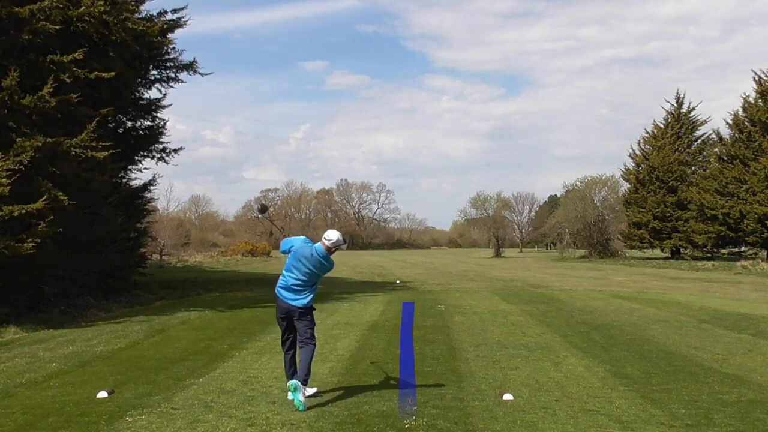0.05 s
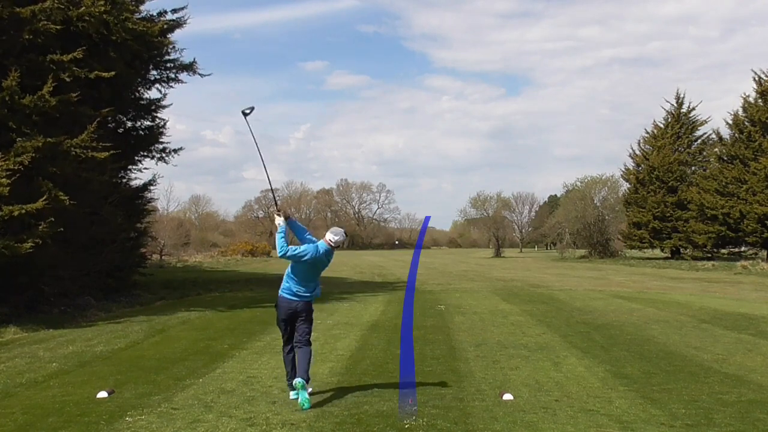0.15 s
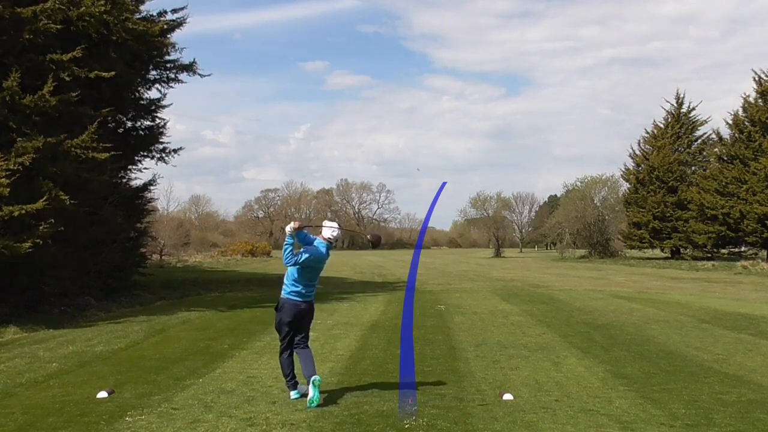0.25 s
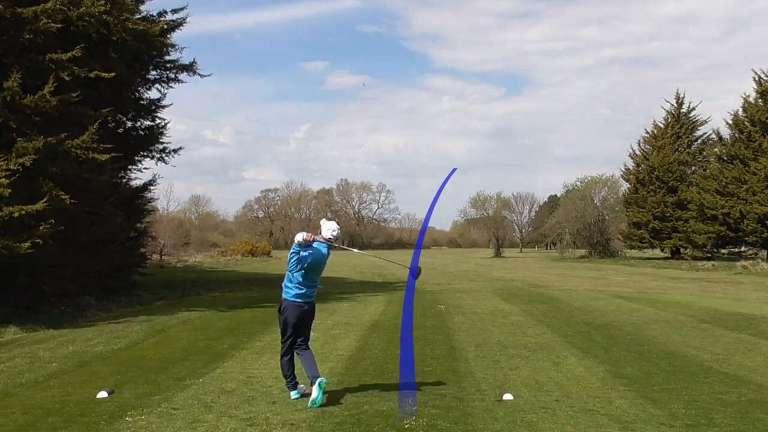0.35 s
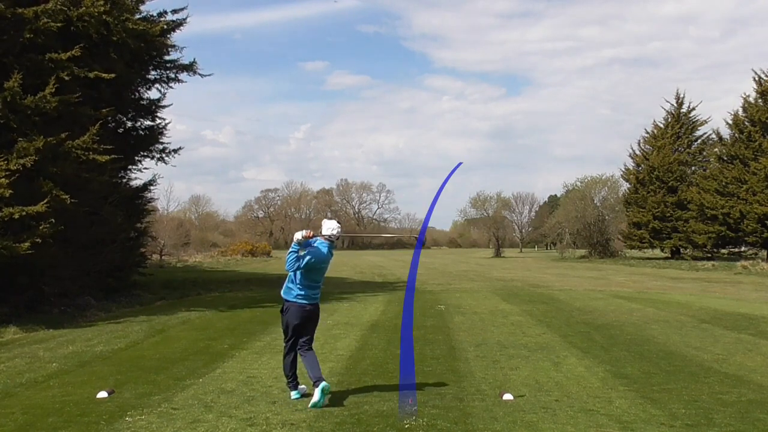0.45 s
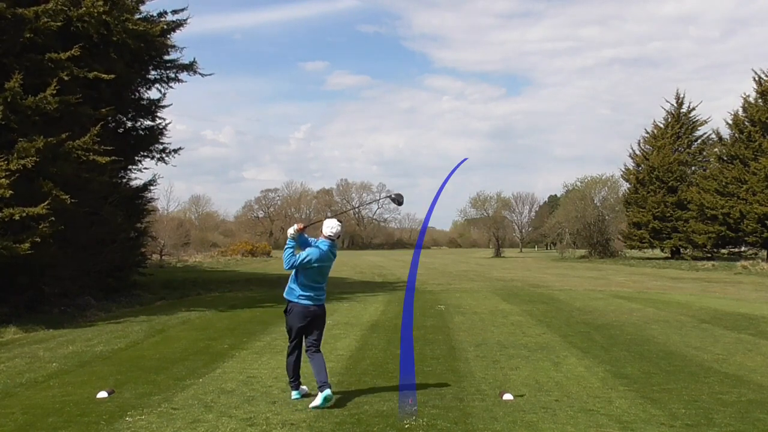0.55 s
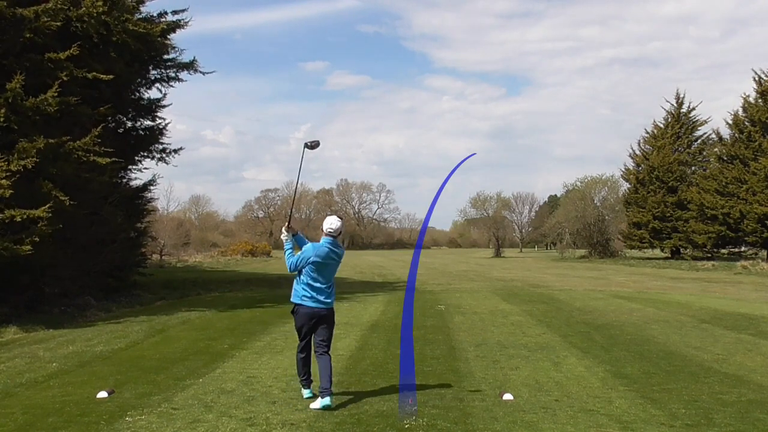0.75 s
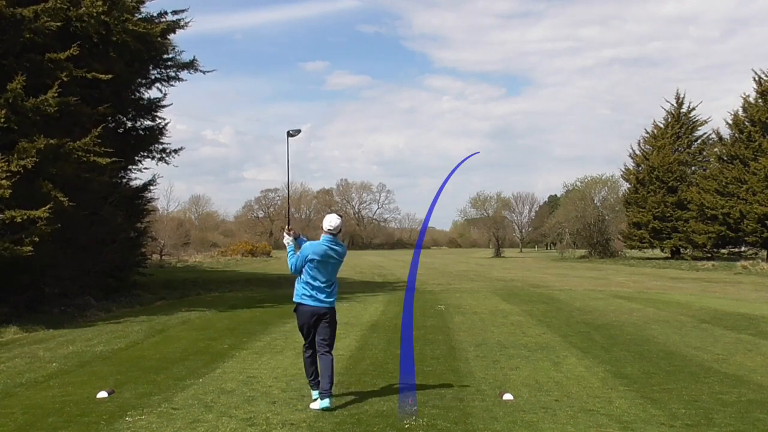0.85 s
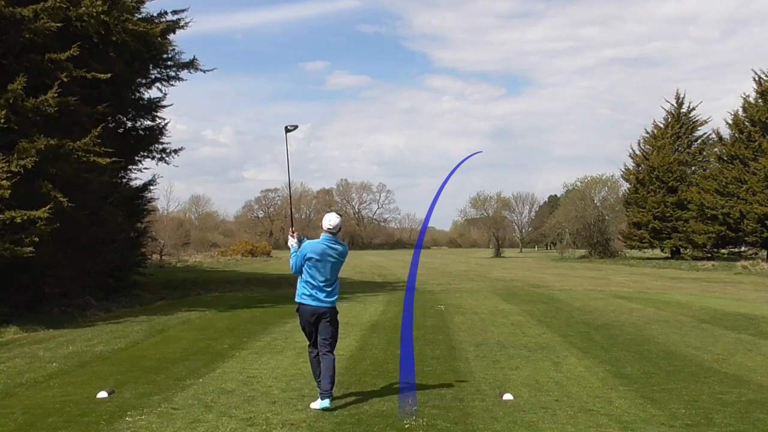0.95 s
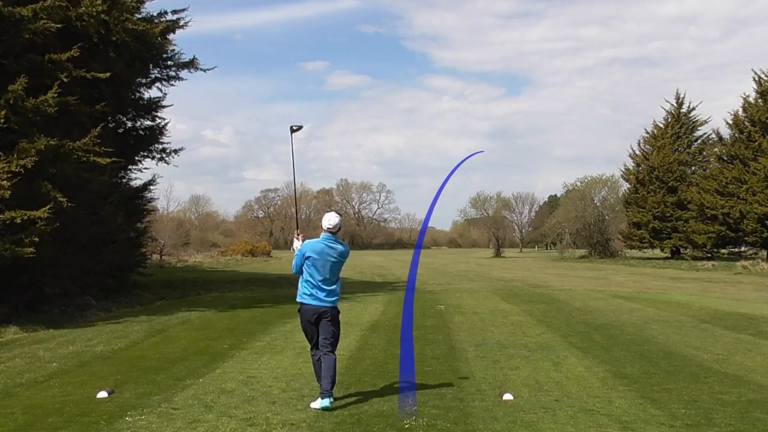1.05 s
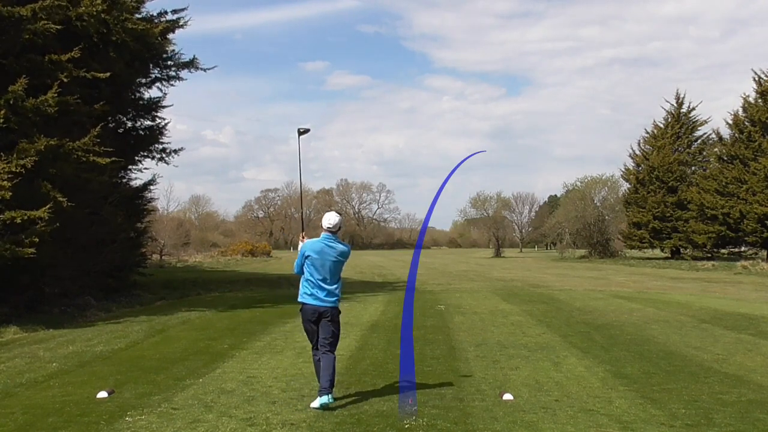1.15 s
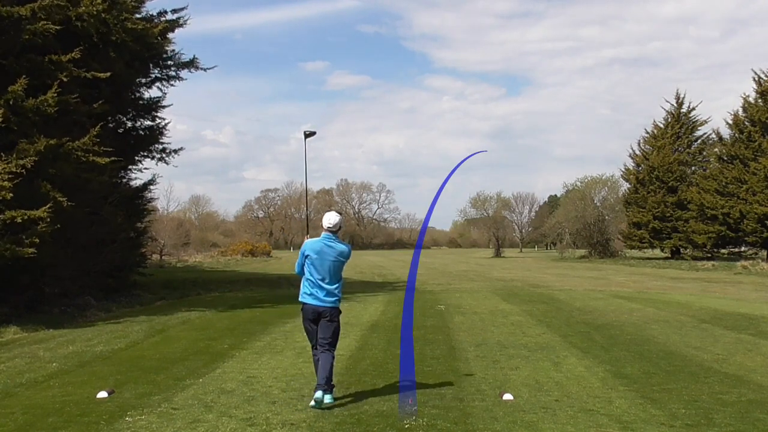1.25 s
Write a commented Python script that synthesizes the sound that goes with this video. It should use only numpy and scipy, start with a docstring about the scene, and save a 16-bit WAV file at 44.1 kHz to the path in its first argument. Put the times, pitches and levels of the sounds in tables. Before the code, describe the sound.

A golf driver cracks a ball off the tee once, over steady low wind.

```python
"""A golf driver swishes down and cracks a ball off the tee, a few metres away on a windy fairway.
The squashed ball thumps, the hollow metal head rings briefly, turf and trees scatter the crack back.
Clothing and shoes tick; behind lie wind, a low hum, a high rustle off a farther tree line, two bird notes.
The crack overloads the microphone; a limiter ducks the wind and lets it swell back."""
import sys
import numpy as np
from scipy import signal
from scipy.fft import rfft, irfft
from scipy.io import wavfile
from scipy.ndimage import uniform_filter1d, minimum_filter1d

SR = 44100
rng = np.random.default_rng(int(sys.argv[2]) if len(sys.argv) > 2 else 0)


def persist_wave(psi):
    """Save psi, clipped to +-1, as 16-bit WAV."""
    counts = np.round(np.clip(psi, -1, 1) * 32767).astype(np.int16)
    wavfile.write(sys.argv[1], SR, np.atleast_2d(counts).T)


N = 57330
T = np.arange(N) / SR
FREQS = np.fft.rfftfreq(N, 1 / SR)
SIDES = np.array([[1], [-1]])  # left, right
STRIKE_S = .2485


def strike():
    """Club on ball: pressure pulse of the squashed ball, ringing head, bright crack, low knock."""
    # club head modes (frequency [Hz], level [dB], t60 [s])
    head_modes = [(3980, -18, 0.035), (4256, -24.5, .06), (5860, -3, 0.031), (5973, -2.5, 0.023),
                  (5990, -25, 0.12), (7090, -7, .018), (7900, -13, 0.038), (8570, -7, 0.017),
                  (8970, -9, 0.016), (9650, -13, 0.023), (11560, -14, 0.017), (11550, -14, 0.023),
                  (13620, -10, 0.018), (14100, -18, .008)]
    # contact crack spectrum (frequency [Hz], relative level [dB])
    crack_spectrum = [(200, -7), (1200, 6), (3000, -25), (5000, -10), (8000, 4.5), (12000, -1.5),
                      (16000, -1.5)]
    thump_hz, knock_hz, right_lag_s = 943, 211.5, 4e-6
    strike_pan_db, knock_pan_db = -3.5, -17  # left minus right
    age_s = np.maximum(T - STRIKE_S, 0)
    thump = -undb(30) * np.sin(2 * np.pi * thump_hz * age_s + np.pi / 4) * decay(STRIKE_S, t60_s=.0026)
    knock = undb(13) * np.sin(2 * np.pi * knock_hz * age_s) * decay(STRIKE_S, t60_s=.012)
    ring = np.zeros(N)
    for hz, db, t60_s in head_modes:
        phase = rng.uniform(0, 2 * np.pi) * (hz > 6500)  # lower modes start in phase
        ring += undb(db) * np.sin(2 * np.pi * hz * age_s + phase) * decay(STRIKE_S, t60_s)
    attack = 1 - np.exp(-(age_s / .0007) ** 2)
    onset_boost = 1 + undb(8.5) * np.exp(-np.maximum(age_s - .0025, 0) / .00059)
    blow = thump + undb(7.5) * attack * onset_boost * ring
    stereo_blow = np.array([blow, np.interp(T - right_lag_s, T, blow)])
    crack = undb(14.5) * noise(crack_spectrum, side=.46) * decay(STRIKE_S + .0003, t60_s=.0092)
    return ((stereo_blow + crack) * undb(SIDES * strike_pan_db / 2)
            + knock * undb(SIDES * knock_pan_db / 2))


def echoes():
    """The crack scatters off the turf at once, then off the trees as a slap with a long tail."""
    # turf scatter spectrum (frequency [Hz], relative level [dB])
    turf_spectrum = [(100, -10), (250, -7.5), (1200, -3), (2000, -10.5), (3000, -17), (4300, -6.5),
                     (5200, -13), (6000, -3.5), (8000, -8.5), (12000, -11.5), (16000, -24)]
    # tree scatter spectrum (frequency [Hz], relative level [dB])
    tree_spectrum = [(150, -14.5), (1100, 1.5), (2000, -6.5), (3000, -12.5), (4300, -2.5), (5300, -13.5),
                     (6200, -5), (7000, -2.5), (8200, -9), (12000, -13), (16000, -35)]
    return_s = STRIKE_S + .082
    turf = undb(-5.5) * decay(STRIKE_S, t60_s=.025) + undb(-19.5) * decay(STRIKE_S, t60_s=.21)
    trees = undb(-37) * decay(return_s, t60_s=.23) + undb(-49) * decay(return_s, t60_s=1)
    return turf * noise(turf_spectrum, side=.74) + trees * noise(tree_spectrum, side=.73)


def swish():
    """Air rushes round shaft and head as the club gathers speed, and fades after the blow."""
    # air rush spectrum (frequency [Hz], relative level [dB])
    spectrum = [(100, -19), (250, 5.5), (900, 1), (1600, -13.5), (3000, -19.5), (5000, -19.5), (7300, -18),
                (10000, -20.5), (13000, -22.5), (16000, -31)]
    peak_db, peak_s, rise_db_per_s, fall_s = -40, .22, 166, .048
    rise = undb(peak_db - rise_db_per_s * np.maximum(peak_s - T, 0))
    fall = np.exp(-np.maximum(T - STRIKE_S, 0) / fall_s)
    return noise(spectrum, side=.45) * rise * fall


def ticks():
    """Clothing and shoes tick faintly as the golfer turns."""
    # ticks (time [s], level [dB], t60 [s])
    events = [(.119, -48.5, .02), (.131, -55, .02), (.158, -53, .02), (.536, -58, .04)]
    # tick spectrum (frequency [Hz], relative level [dB])
    spectrum = [(500, -8), (2200, 8.5), (4000, -9), (7500, 0.5), (10000, -14), (16000, -25)]
    envelope = sum(undb(db) * decay(start_s, t60_s) for start_s, db, t60_s in events)
    return noise(spectrum, side=.39) * envelope


def wind():
    """A dull rush that follows the gusts and flutters, over a thin steady hiss."""
    # wind spectrum (frequency [Hz], relative level [dB])
    spectrum = [(15, -43), (25, -15.5), (87, -3.5), (120, -6.5), (180, -4.5), (301, -7), (363, -10),
                (503, -9.5), (840, -9), (1160, -14.5), (1890, -34.5), (2480, -37.5), (2690, -39.5),
                (5430, -42.5), (7110, -44), (14800, -45), (16000, -54)]
    # stereo width (frequency [Hz], side minus mid [dB])
    width = [(60, -16), (110, -19), (200, -14.5), (380, -8.5), (700, -6), (1290, -2.5), (2380, -0.5),
             (4400, 0.5), (8120, 1), (15000, -1.5)]
    # stereo balance (frequency [Hz], left minus right [dB])
    balance = [(60, 2.5), (110, -2.5), (200, -0.5), (380, -2.5), (700, -1), (1290, 2.5), (2380, 0.5),
               (4400, 3.5), (8120, -0.5), (15000, -3)]
    # gust contour (time [s], level [dB])
    gusts = [(0, -45.5), (.15, -45.5), (.5, -45), (.7, -43.5), (1.0, -43.5), (1.3, -44.5)]
    split_hz, flutter_db = 1800, 1
    air = rfft(noise(spectrum, side=curve(width))) * curve(balance) ** (SIDES / 2)
    lowpass = 1 / (1 + (FREQS / split_hz) ** 4)
    gust_s, gust_db = np.array(gusts).T
    rush_db = np.interp(T, gust_s, gust_db) + flutter_db * wander(rate_hz=9.3)
    rush = irfft(air * lowpass, N) * undb(rush_db)
    hiss = irfft(air * (1 - lowpass), N) * undb(-42.5)
    return rush + hiss


def hum():
    """A wavering low drone, like a far mower."""
    # drone harmonics (multiple, rms level [dB])
    harmonics = [(1, -52), (2, -58.5)]
    pitch_hz, waver, flutter_db = 91.44, .024, 2
    phase = 2 * np.pi * np.cumsum(pitch_hz * (1 + waver * wander(rate_hz=15.3))) / SR
    return sum(np.sqrt(2) * undb(db + flutter_db * wander(rate_hz=10)) * np.sin(k * phase)
               for k, db in harmonics)


def far_echo_and_birds():
    """Faint high rustle of the crack echoing off a farther tree line, then two blurred bird notes."""
    # tree echo in row 1, bird notes in rows 2-3
    # (time [s], length [s], pitch [Hz], glide [Hz], level [dB], pitch scatter [Hz])
    events = [(.6, 0.14, 7070, 66, -67, 149), (0.714, 0.18, 2444, 18, -66.5, 45.5),
              (.988, .05, 2750, 170, -65, 25)]
    out = np.zeros(N)
    for start_s, length_s, hz, glide_hz, db, scatter_hz in events:
        progress = np.clip((T - start_s) / length_s, 0, 1)
        pitch_hz = hz + glide_hz * progress + scatter_hz * wander(rate_hz=370)
        out += undb(db) * np.sin(np.pi * progress) * np.sin(2 * np.pi * np.cumsum(pitch_hz) / SR)
    return out


def undb(db):
    """Decibels to gain."""
    return 10 ** (np.asarray(db) / 20)


def curve(points):
    """Gain per FFT bin from (frequency [Hz], level [dB]) points."""
    hz, db = np.array(points, float).T
    return undb(np.interp(np.log(np.maximum(FREQS, 1)), np.log(hz), db))


def noise(spectrum, side):
    """Shaped stereo noise: mid at unit rms, side scaled by `side`."""
    gain = curve(spectrum)
    gain = gain / np.sqrt(np.mean(gain ** 2))
    mid, wide = rfft(rng.standard_normal((2, N))) * gain
    return irfft(mid + SIDES * side * wide, N)


def wander(rate_hz):
    """Smooth random drift, unit rms."""
    drift = irfft(rfft(rng.standard_normal(N)) * np.exp(-(FREQS / rate_hz) ** 2), N)
    return drift / np.sqrt(np.mean(drift ** 2))


def decay(start_s, t60_s):
    """Sudden start, exponential fall."""
    return (T >= start_s) * np.exp(-np.log(1000) * np.maximum(T - start_s, 0) / t60_s)


def scene():
    """Swing and blow on the open course."""
    return strike() + echoes() + swish() + ticks() + far_echo_and_birds() + wind() + hum()


def record(dry):
    """The microphone saturates; a limiter ducks, thins the bass, holds and recovers; the top is cut."""
    overload_db, limit_db, hold_s, release_s = 20, -7.5, .069, .076
    bass_hz, max_bass_cut, full_cut_db, slew_s = 125, .53, 10, .033
    top_hz = 16200
    saturated = undb(overload_db) * np.tanh(dry / undb(overload_db))
    peak_db = 20 * np.log10(np.abs(saturated).max(axis=0) + 1e-9)
    over_db = np.maximum(peak_db - limit_db, 0)
    hold_n = int(hold_s * SR) | 1
    held_db = -minimum_filter1d(-over_db, hold_n, origin=hold_n // 2, mode="constant")  # trailing max
    release = np.exp(-T / release_s)
    duck_db = np.maximum.accumulate(held_db / release) * release
    ducked = saturated * undb(-duck_db)
    bass = irfft(rfft(ducked) / (1 + (FREQS / bass_hz) ** 6), N)
    bass_cut = max_bass_cut * np.clip(uniform_filter1d(duck_db, int(slew_s * SR)) / full_cut_db, 0, 1)
    lowpass = signal.ellip(8, .2, 70, top_hz, fs=SR, output="sos")
    return signal.sosfilt(lowpass, ducked - bass * bass_cut)


dry = scene()
out = record(dry)
persist_wave(out)
```